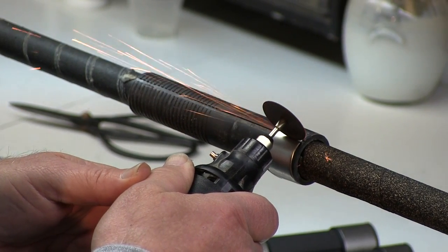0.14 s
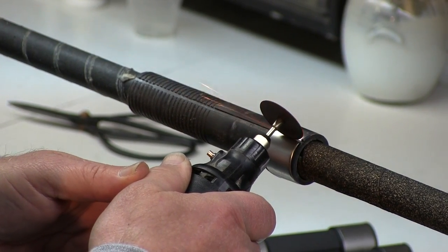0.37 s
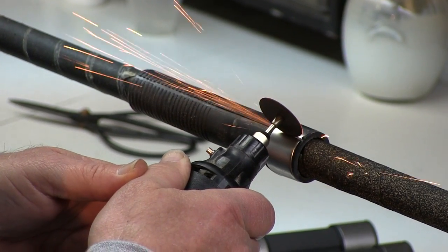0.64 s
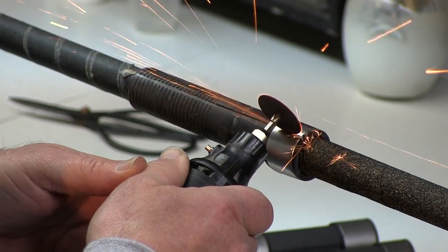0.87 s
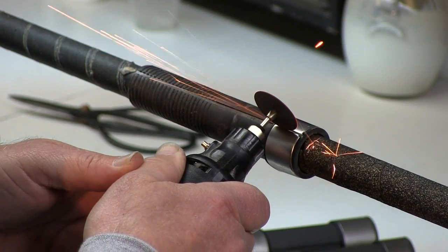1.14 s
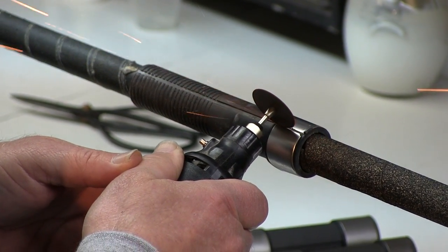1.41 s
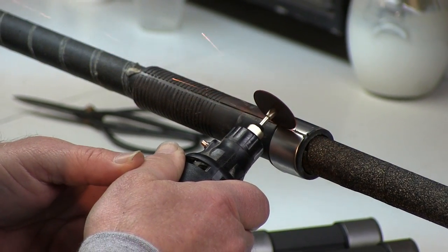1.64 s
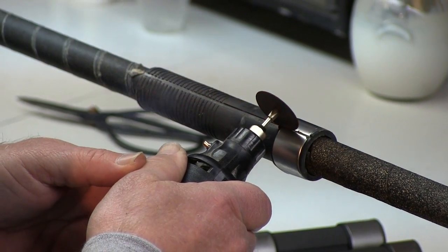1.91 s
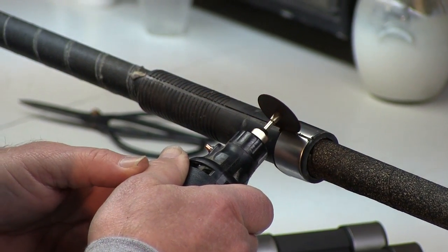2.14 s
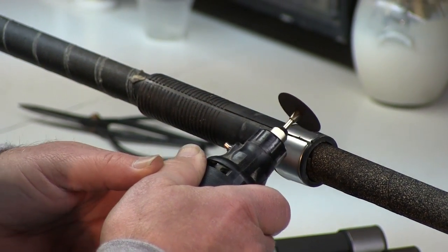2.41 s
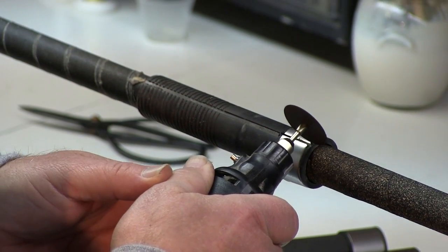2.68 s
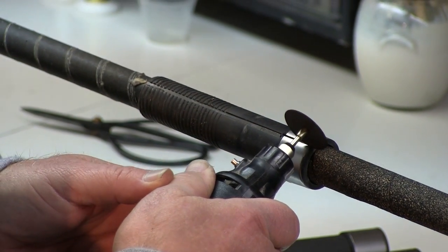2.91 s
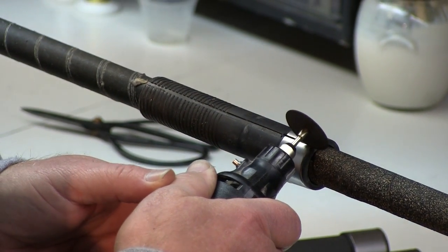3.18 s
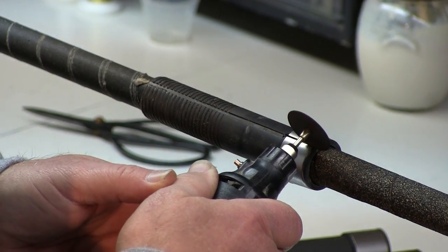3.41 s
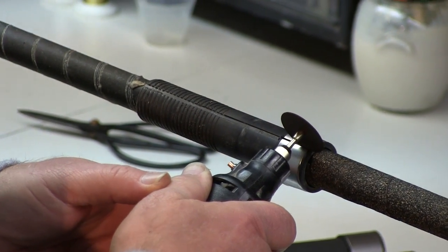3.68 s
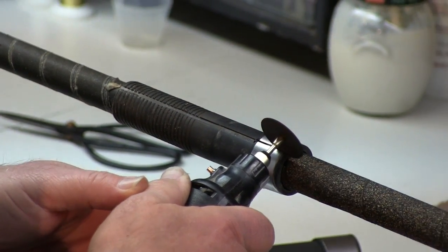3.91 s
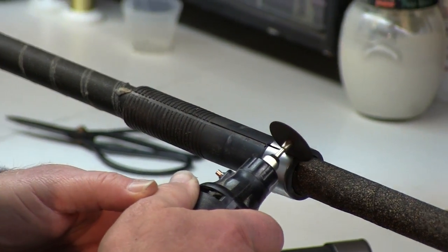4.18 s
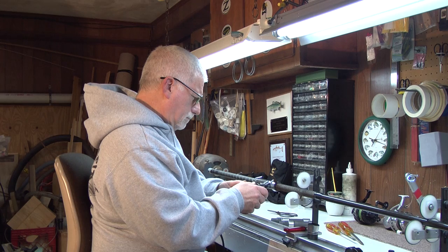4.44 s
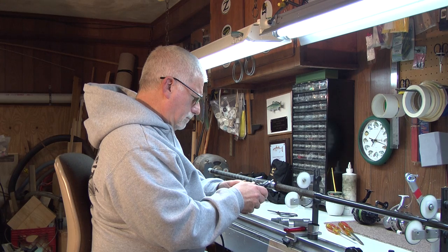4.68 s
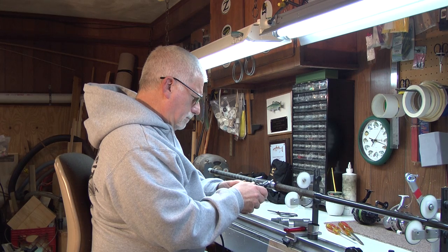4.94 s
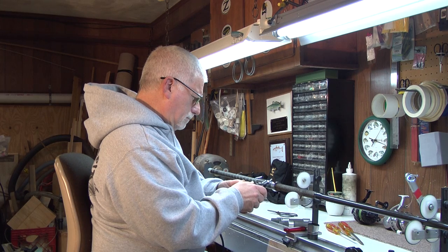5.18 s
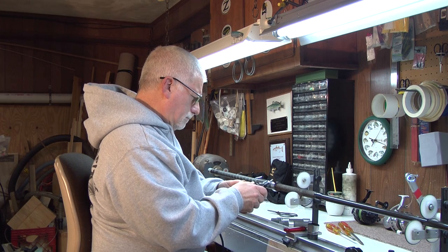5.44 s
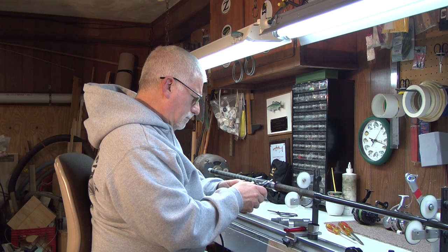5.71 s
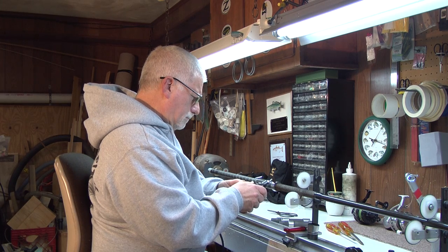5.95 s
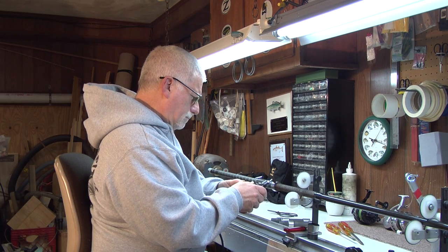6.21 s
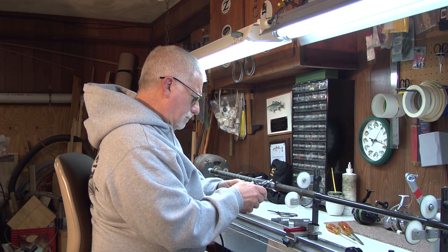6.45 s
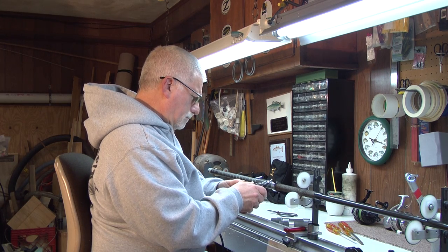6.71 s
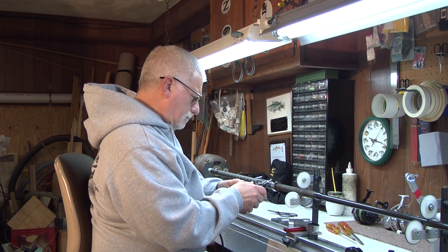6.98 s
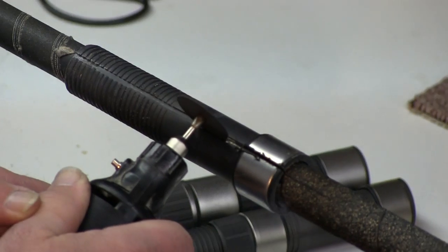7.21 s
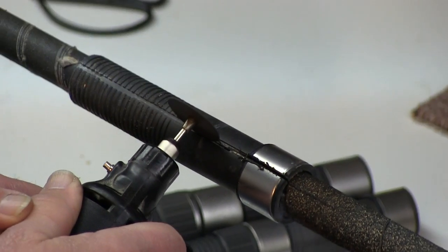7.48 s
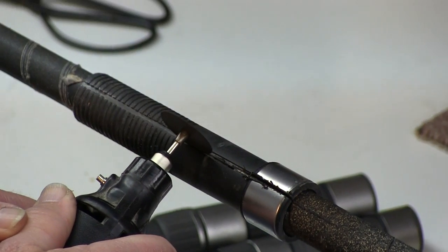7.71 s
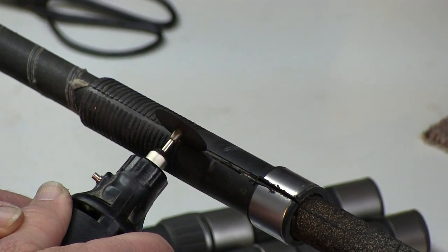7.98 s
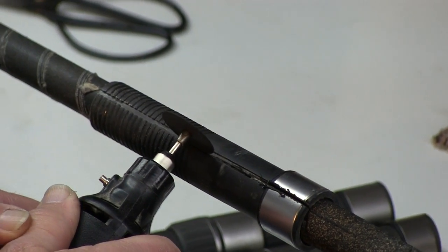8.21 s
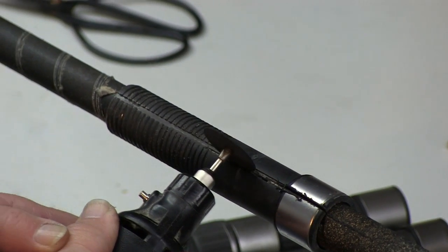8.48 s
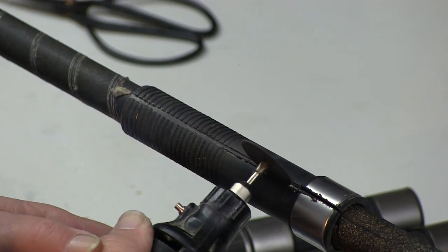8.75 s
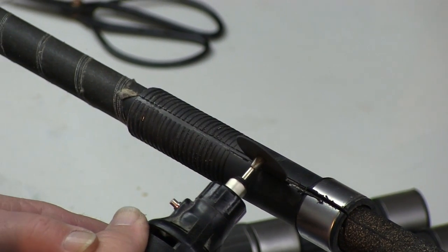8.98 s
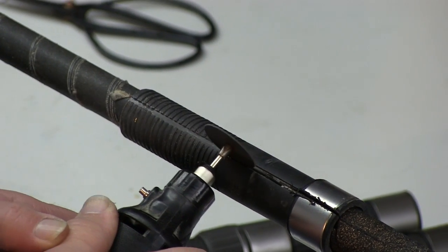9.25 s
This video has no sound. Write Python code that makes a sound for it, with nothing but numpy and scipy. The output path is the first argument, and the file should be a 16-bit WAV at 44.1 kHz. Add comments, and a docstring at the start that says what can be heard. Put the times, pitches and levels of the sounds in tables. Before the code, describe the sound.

Close, harsh high-speed grinding with a metallic, buzzing scream that wanders in pitch, lifts briefly to a freer motor whir, then cuts on without stopping.

```python
"""Rotary tool cutting a rod

A handheld rotary tool cuts a metal and plastic rod fitting with a thin wheel, in a quiet workshop.
The uneven rim strikes once a turn: a harmonic series on the shaft speed, shaped by rod and wheel modes.
Single harmonics sing out, grit tears as noise pulsing once a turn, and the speed sags under load.
Motor tones and rush lie beneath, bared when the wheel lifts out; rumble and faint hums fill the room."""
import sys
import numpy as np
from scipy import signal
from scipy.io import wavfile
from scipy.ndimage import uniform_filter1d

SR = 44100
rng = np.random.default_rng(int(sys.argv[2]) if len(sys.argv) > 2 else 0)


def transcribe(u):
    """Save the signal u as a 16-bit wav file named by the first command-line argument.

    u: samples, shape (n,) or (channels, n), limited to [-1, 1]; the rate is SR.
    q: integer samples, one column per channel.
    """
    v = np.clip(np.atleast_2d(u).T, -1, 1)
    q = np.round(v * 32767).astype(np.int16)
    wavfile.write(sys.argv[1], SR, q)


def field_ratio(decibels):
    """Amplitude ratio for a level in dB (20 dB per decade); scalars and array-likes work."""
    return 10 ** (np.asarray(decibels, dtype=float) / 20)


N = 413216
HOP = 256  # samples from one control frame to the next
FRAMES = np.arange(N // HOP + 6) * HOP / SR  # s
TOP = 47  # highest multiple of the shaft speed


def log_curve(points, at):
    """Interpolation: straight lines between the points on a logarithmic axis."""
    where, value = np.transpose(points)
    return np.interp(np.log(at + 1e-3), np.log(where), value)


def time_curves(rows):
    """Interpolation: each column of a time table, read at every frame."""
    start_s, *columns = np.transpose(rows)
    return [np.interp(FRAMES, start_s, column) for column in columns]


def to_samples(frame_values):
    """Interpolation: one value per frame becomes one per sample."""
    return np.interp(np.arange(N) / HOP, np.arange(len(frame_values)), frame_values)


def drift(count, smooth_s):
    """Low-passed chance: twice-averaged white noise gives rows of slow wandering, rms 1."""
    size = max(round(smooth_s * SR / HOP), 1)
    slow = rng.standard_normal((len(FRAMES), count))
    for _ in range(2):
        slow = uniform_filter1d(slow, size, 0)
    return slow.T / slow.std()


def patchy():
    """Spectral modulation: power gain that drifts in patches about a kilohertz wide."""
    bands = drift(count=24, smooth_s=0.04)
    place = np.linspace(0, len(bands) - 1.001, num=513)[:, None]
    low, share = place[:, 0].astype(int), place % 1
    patch_db = 1.8 * ((1 - share) * bands[low] + share * bands[low + 1])
    return field_ratio(patch_db) ** 2


def noise(power):
    """Spectral shaping: random Fourier bins take a given power per Hz (bins x frames)."""
    a, b = rng.standard_normal((power.shape[1], power.shape[0], 2)).T
    scale = np.sqrt(SR / 4 / 1024 * 6)
    bins = (a + 1j * b) * np.sqrt(power) * scale / 2
    return signal.istft(bins, nperseg=1024, noverlap=1024 - HOP)[1][:N]


# moments when the wheel moves to a new place on the rod: start_s
GRIP_CHANGES = [3.5, 7.08]


def by_grip(values):
    """Boundary condition: of three values, the one for the grip that holds at each frame."""
    return np.array(values)[np.searchsorted(GRIP_CHANGES, FRAMES)]


# faint steady hums of the workshop: pitch_hz [Hz], level_db [dB rms]
HUMS = [(53.8, -75), (118.4, -74.5), (242.2, -70.5)]


def workshop_hums():
    """Steady sinusoids: each hum is a pure tone of constant level."""
    time_s = np.arange(N) / SR
    return sum(np.sqrt(2) * field_ratio(level_db) * np.sin(2 * np.pi * hz * time_s) for hz, level_db in HUMS)


# workshop rumble before the shifts below: pitch_hz [Hz], density_db [dB per Hz]
ROOM = [(30, -102), (60, -75), (80, -96), (400, -81)]
# shift of the rumble in each of the three grips: level_db [dB]
ROOM_SHIFT = [-2, 1.5, 10]


def room_rumble(hz, rush_db):
    """Background noise: low rumble whose level changes with the grip and slightly with the motor rush."""
    shift_db = by_grip(ROOM_SHIFT) + 0.25 * (rush_db + 38)  # usual rush is -38 dB
    return noise(field_ratio(log_curve(ROOM, hz) + shift_db) ** 2)


# brushes and cooling air: pitch_hz [Hz], density_db [dB per Hz, relative to the rush level]
RUSH = [(150, -67), (300, -41.5), (600, -32), (1500, -30), (3200, -24.5), (4800, -26), (6200, -32),
        (9000, -36), (15500, -42)]


def motor_rush(hz, rush_db, beat):
    """Turbulence and friction: broadband noise, lightly modulated once a turn."""
    rush = noise(field_ratio(log_curve(RUSH, hz) + rush_db) ** 2 * patchy())
    return rush * (1 + 0.19 * beat)


# bare motor tones before the commutator boost: multiple [of shaft speed], level_db [dB re rush level]
MOTOR = [(2, -4.5), (3, -3.5), (5, -4.5), (8, -4.5), (12, -7), (20, -13.5), (30, -29), (47, -33)]


def motor_partials(multiple, rush_db):
    """Commutation: complex harmonic amplitudes, stronger at multiples of the ten-bar commutator."""
    bars_db = 6 * (multiple % 10 == 0)  # the brushes cross each bar
    level_db = rush_db + log_curve(MOTOR, multiple) + bars_db + 2.8 * drift(count=TOP, smooth_s=0.04)
    phase_rad = 3 * drift(count=TOP, smooth_s=0.45)
    return np.sqrt(2) * field_ratio(level_db) * np.exp(1j * phase_rad)


def shaft_shake(shake_db):
    """Rotating unbalance: an off-centre mass shakes the tool at the shaft speed itself."""
    return np.sqrt(2) * field_ratio(shake_db + 1.35 * drift(count=1, smooth_s=0.03)[0])


# shaft speed before smoothing and flutter: start_s [s], speed_hz [turns per s]
SPEED = [(0.0, 348), (0.05, 346), (0.28, 367), (0.55, 343), (0.81, 355), (1.02, 341), (1.69, 333),
         (1.98, 323), (2.24, 267), (2.29, 265), (2.35, 281), (2.45, 376), (2.53, 421), (2.66, 463),
         (2.84, 482), (3.1, 486), (3.6, 427), (3.91, 418), (4.18, 360), (4.23, 359), (4.33, 380),
         (4.41, 378), (4.54, 350), (4.62, 363), (4.8, 354), (4.85, 327), (4.96, 330), (5.06, 376),
         (5.22, 415), (5.32, 429), (5.61, 427), (5.82, 402), (6.13, 422), (6.26, 410), (6.34, 390),
         (6.65, 381), (6.71, 369), (6.97, 381), (7.25, 328), (7.57, 323), (7.72, 337), (7.86, 331),
         (7.96, 312), (8.06, 311), (8.48, 333), (8.66, 362), (8.85, 352), (8.92, 369), (9.06, 371),
         (9.08, 384), (9.24, 404), (9.37, 387)]
# how roughly the wheel tears: start_s [s], rough_db [dB on the tearing noise and on the speed flutter]
ROUGH = [(0, -4), (1.95, -4), (2.05, 5), (2.4, 5), (2.5, -4), (3.95, -4), (4.1, 1), (5.1, 1), (5.25, -6),
         (6.95, -4), (7.05, 4), (7.25, -1), (8.3, -1), (8.45, 3), (9.37, 3)]


def shaft_turns():
    """Phase integration: turns are the running sum of speed, which flutters a little as the grit bites."""
    flutter = 0.00183 * field_ratio(time_curves(ROUGH)[0]) * drift(count=1, smooth_s=0.014)[0]
    speed = uniform_filter1d(time_curves(SPEED)[0], size=7) * (1 + flutter)
    return speed, np.cumsum(to_samples(speed)) / SR


def ringing(modes, hz, tremble_db):
    """Modal resonance: power per Hz of a sum of squared Lorentzian peaks, total near 1."""
    humps, total = 0, 0
    for (centre_hz, width_hz, *level_db), mode_tremble_db in zip(modes, tremble_db):
        power = field_ratio(by_grip(level_db)) ** 2
        peak = 1 / (1 + (2 * (hz - centre_hz) / width_hz) ** 2) ** 2
        humps = humps + power * field_ratio(mode_tremble_db) ** 2 * peak
        total = total + power * width_hz * np.pi / 4  # area under the peak
    return humps / total


# the wheel lifts out of the slot, or merely eases off: start_s [s], length_s [s], rod_fall_db [dB],
# wheel_fall_db [dB], rod_return_s [s to bite fully again]
LIFTS = [(2.395, 0.666, -20, -19, 0.49), (8.9, 0.342, -5, -10, 0.041)]


def lift_db(column, back_s=None):
    """Loss of excitation: level change in dB while the wheel is lifted out or merely eased off."""
    change_db = 0
    for row in LIFTS:
        out = (FRAMES - row[0]) / 0.035  # the ringing falls within 35 ms
        back = 1 - (FRAMES - row[0] - row[1]) / (back_s or row[4])
        change_db = change_db + row[column] * np.clip(np.minimum(out, back), 0, 1)
    return change_db


# rod resonances: pitch_hz [Hz], width_hz [Hz], grip_1_db, grip_2_db, grip_3_db [dB within the set]
ROD = [(895, 2900, -14.5, -16, -36), (2906, 1140, -8.5, -6, -6.5), (4096, 810, 0, 0.5, 2.5),
       (5530, 1250, -3.5, 3.5, 2.5), (7327, 980, -2.5, -1, 1.5), (9060, 2100, -10.5, -2, -6)]
# wheel resonances: pitch_hz [Hz], width_hz [Hz], grip_1_db, grip_2_db, grip_3_db [dB within the set]
WHEEL = [(11170, 860, -4, -7.5, -1), (12200, 1300, 2, 3, -2), (13710, 930, -0.5, 4.5, -1.5),
         (15200, 400, -18, -15.5, -15)]
# how hard the wheel bites: start_s [s], bite_db [dB about the usual bite]
BITE = [(0, -1.5), (0.22, 4.5), (0.3, 0), (0.56, 3.5), (0.8, -0.5), (0.95, 2), (1.19, -3), (1.64, 1),
        (1.74, 0.5), (2.38, -0.8), (3.13, 2.5), (3.49, 2.5), (3.73, 2), (3.88, 3.5), (4.0, 0.5), (4.34, 3),
        (4.81, 2.1), (5.2, 2), (5.42, -0.5), (5.59, 1.5), (5.76, -1.5), (5.89, 2.5), (6.04, -1.5),
        (6.08, -1.5), (6.22, 1.2), (6.31, 0.5), (6.38, 4.5), (6.51, 0.8), (6.57, 4.5), (6.82, -0.2),
        (7.1, 0.7), (7.63, 0.5), (7.79, 0), (7.85, -1), (8.71, -1), (8.88, 3.5), (9.37, -0.5)]
# rod drive at the usual bite in each of the three grips: level_db [dB]
ROD_DRIVE = [-15, -18, -14.5]
# wheel drive at the usual bite in each of the three grips: level_db [dB]
WHEEL_DRIVE = [-20, -18, -21]


def cut_power(hz, tremble_db):
    """Forced vibration: power per Hz that the cut sets ringing in rod and wheel."""
    bite_db = time_curves(BITE)[0]
    rod_db = by_grip(ROD_DRIVE) + 0.97 * bite_db + lift_db(column=2)
    # the wheel rings again at first touch
    wheel_db = by_grip(WHEEL_DRIVE) + 0.89 * bite_db + lift_db(column=3, back_s=0.025)
    rod = field_ratio(rod_db) ** 2 * ringing(ROD, hz, tremble_db)
    wheel = field_ratio(wheel_db) ** 2 * ringing(WHEEL, hz, tremble_db[len(ROD):])
    return rod + wheel


# tearing noise before the roughness: pitch_hz [Hz], level_db [dB relative to the cut's power per Hz]
GRIT = [(600, -25), (3000, -17), (8000, -8.5), (15000, -6.5)]


def tearing_grit(hz, tremble_db, beat):
    """Abrasion: resonant noise in quick bursts, tearing hardest at one place of each turn."""
    bursts_db = to_samples(2.5 * rng.standard_normal(len(FRAMES)))
    grit_gain = field_ratio(log_curve(GRIT, hz) + time_curves(ROUGH)[0]) ** 2
    grit = noise(cut_power(hz, tremble_db) * grit_gain * patchy())
    return grit * field_ratio(bursts_db) * (1 + 0.98 * beat)


def cut_partials(cut):
    """Periodic impact: complex harmonic amplitudes that wander at random in size and phase."""
    wander = drift(count=TOP, smooth_s=0.045) + 1j * drift(count=TOP, smooth_s=0.031)
    wander *= np.tanh(abs(wander) / 2.89) * 2.034 / abs(wander)  # chance swells stay modest
    return np.sqrt(cut) * wander


def chance_songs(speed, cut):
    """Resonant coincidence: at random moments a multiple near a rod resonance sings out."""
    modes = ROD[1:]
    for when, long, which, off in rng.random((24, 4)):
        frame = int(when * N / HOP)
        hz, width_hz, *_ = modes[int(which * len(modes))]
        multiple = min(round((hz + width_hz * (off - 0.5)) / speed[frame]), TOP)
        length_s = 0.17 * (0.5 + long)
        level_db = 10 * np.log10(cut[multiple - 1, frame]) + 5  # 5 dB over the ringing there
        yield FRAMES[frame], length_s, multiple, level_db


# one multiple sings out: start_s [s], length_s [s], multiple [of shaft speed],
# level_db [dB rms before the waver]
SINGS = [(0.01, 0.36, 11, -22.5), (0.183, 0.18, 9, -22), (0.19, 1.35, 3, -33), (0.35, 0.32, 12, -24),
         (0.486, 0.34, 11, -23), (0.88, 0.64, 12, -18.5), (1.064, 0.46, 16, -24.5),
         (1.446, 0.574, 2, -26.5), (1.466, 0.48, 7, -29), (1.695, 0.32, 4, -28.5), (1.923, 0.13, 13, -18),
         (2.232, 0.058, 17, -21), (2.417, 0.26, 10, -23.5), (2.708, 0.49, 10, -19.5), (2.783, 0.37, 9, -22),
         (3.42, 0.16, 31, -17), (3.61, 0.12, 32, -17.5), (3.68, 0.23, 7, -27), (3.72, 0.21, 13, -25.5),
         (3.76, 0.24, 33, -22), (3.996, 0.7, 3, -35), (4.015, 0.25, 16, -24), (4.56, 0.12, 16, -20.5),
         (4.8, 0.2, 12, -28.5), (5.306, 0.35, 12, -20.5), (5.576, 0.17, 13, -19.5),
         (5.793, 0.26, 20, -21.5), (5.792, 0.39, 13, -26.5), (5.877, 0.18, 12, -27),
         (6.155, 0.13, 12, -20.5), (6.37, 0.12, 21, -19.5), (6.416, 0.78, 3, -34.5),
         (6.643, 0.236, 11, -23), (6.72, 0.26, 22, -24), (6.933, 1.01, 2, -34.5), (7.123, 0.066, 16, -19),
         (7.23, 0.4, 22, -24), (7.247, 0.32, 8, -28.5), (7.99, 0.13, 14, -22.5), (8.396, 0.13, 13, -21.5),
         (8.724, 0.33, 10, -25), (8.895, 0.62, 3, -29), (9.177, 0.12, 10, -19)]


def sing(size, speed, cut):
    """Coherent response: a singing multiple holds its phase, fading in over its wandering self."""
    songs = list(chance_songs(speed, cut)) + SINGS
    waver = field_ratio(2.05 * drift(count=TOP, smooth_s=0.025))
    for (start_s, length_s, multiple, level_db), phase in zip(songs, rng.random(len(songs))):
        row = round(multiple) - 1
        inside_s = np.minimum(FRAMES - start_s, start_s + length_s - FRAMES)
        swell = np.clip(inside_s / (0.037 + 0.1 * length_s) + 0.5, 0, 1)
        held = np.sqrt(2) * field_ratio(level_db) * waver[row] * np.exp(2j * np.pi * phase)
        size[row] += swell * (held - size[row])


def shaft_tones(speed, turns, tremble_db, rush_db, shake_db):
    """Harmonic series: cut and motor sound together at the multiples of the shaft speed."""
    multiple = np.arange(1, TOP + 1)[:, None]
    # one harmonic gathers the power of a band as wide as the shaft speed, less 1 dB
    cut = cut_power(multiple * speed, tremble_db) * speed * field_ratio(-1.0) ** 2
    size = cut_partials(cut) + motor_partials(multiple, rush_db)
    size[0] = shaft_shake(shake_db)  # the first multiple is the shake alone
    sing(size, speed, cut)
    step, spin, out = np.exp(2j * np.pi * turns), 1, np.zeros(N)
    for row in size:
        spin = spin * step  # the next multiple
        out += (to_samples(row) * spin).real
    return out


# bare motor: start_s [s], rush_db [dB, brushes and air], shake_db [dB rms before drift, once a turn]
MOTOR_LEVEL = [(0, -36, -46.5), (0.6, -39, -46.5), (1.25, -45.5, -53), (1.65, -37, -45),
               (2.38, -42.5, -44.5), (2.44, -32, -32), (2.52, -27, -26.5), (3.2, -27, -27.5),
               (3.69, -36.5, -41), (3.9, -38.5, -34), (4.8, -43, -44.5), (5.27, -38, -36),
               (5.55, -37, -43.5), (5.85, -41, -37.5), (6.96, -35.5, -32.5), (7.2, -39, -39.5),
               (8.17, -37, -44), (8.68, -32, -31.5), (8.86, -35, -35.5), (9.1, -30, -26),
               (9.37, -30.5, -26)]


def scene():
    """Superposition: tool and room add at one microphone, equal in both channels."""
    rush_db, shake_db = time_curves(MOTOR_LEVEL)
    speed, turns = shaft_turns()
    beat = np.cos(2 * np.pi * turns)
    hz = np.fft.rfftfreq(1024, 1 / SR)[:, None]
    chatter_db = 0.94 * drift(count=1, smooth_s=0.012)  # the wheel skips in the slot
    creep_db = 2.66 * drift(count=len(ROD + WHEEL), smooth_s=0.04)  # the point of contact creeps
    tremble_db = chatter_db + creep_db
    mono = workshop_hums() + room_rumble(hz, rush_db) + motor_rush(hz, rush_db, beat)
    mono += tearing_grit(hz, tremble_db, beat)
    mono += shaft_tones(speed, turns, tremble_db, rush_db, shake_db)
    return np.array([mono, mono])


def top_cut(x):
    """Nothing passes above the cut-off."""
    return signal.sosfilt(signal.butter(12, 15920, fs=SR, output="sos"), x)


def record(dry):
    """Band limiting: a linear-phase low-pass removes the top of the treble."""
    lowpass = signal.firwin(511, 15760, window=("kaiser", 9), fs=SR)
    mix = signal.oaconvolve(dry, lowpass[None], "same")
    return top_cut(mix)


dry = scene()
out = record(dry)
transcribe(out)
```